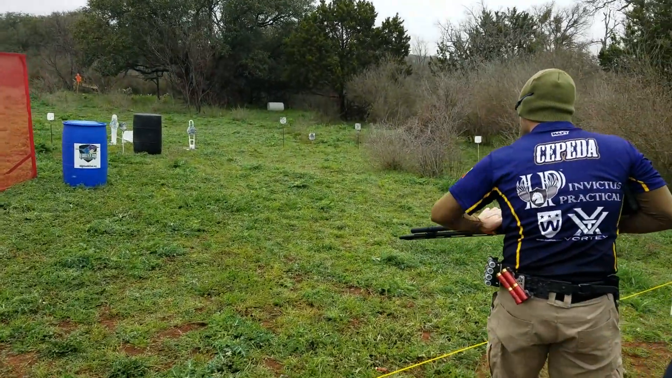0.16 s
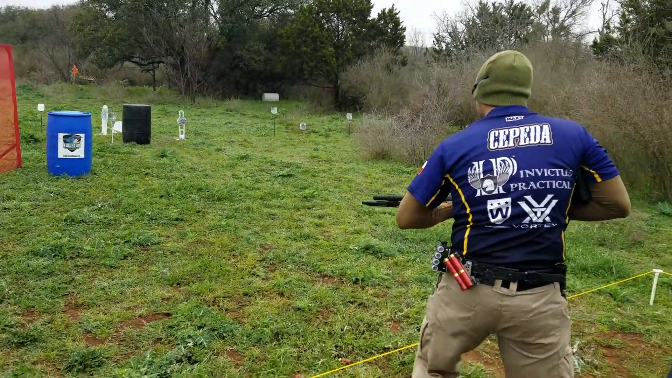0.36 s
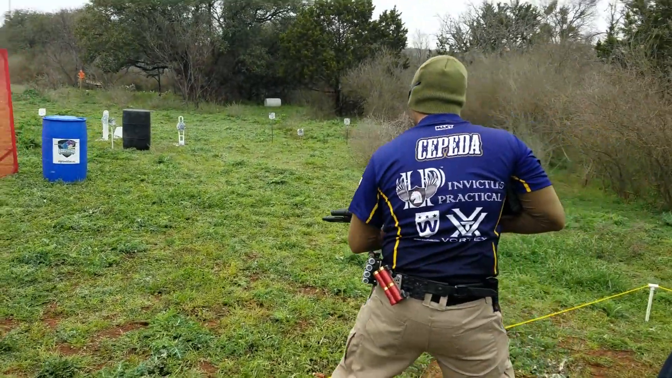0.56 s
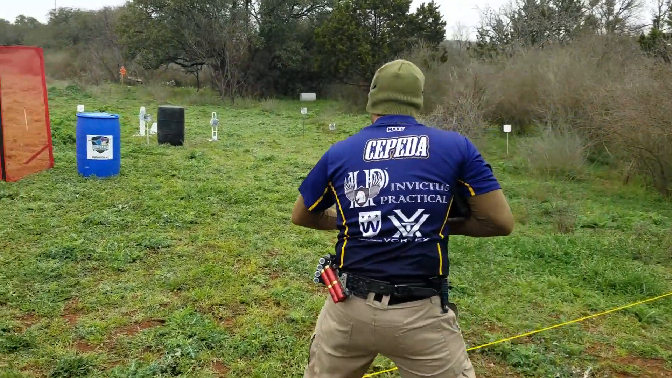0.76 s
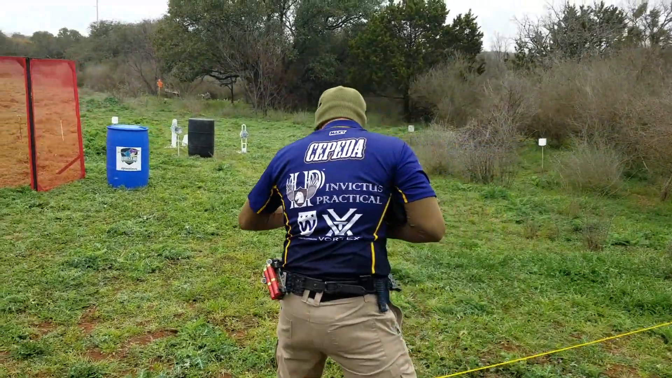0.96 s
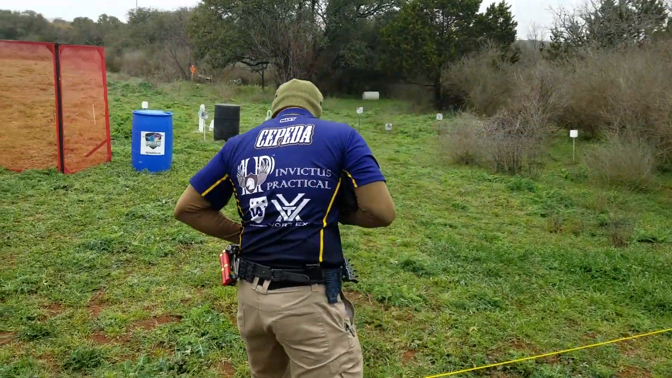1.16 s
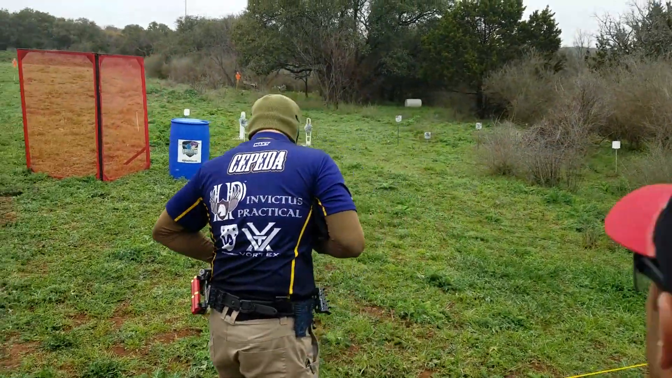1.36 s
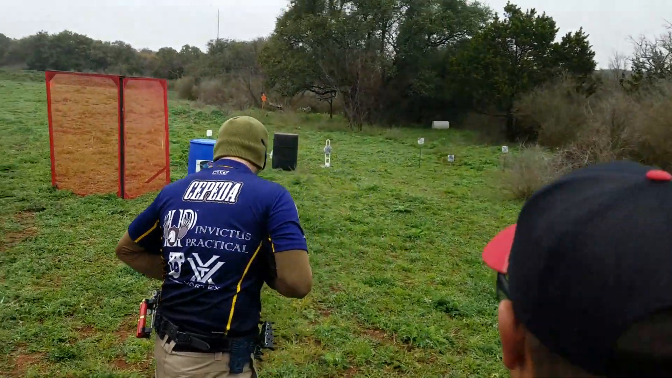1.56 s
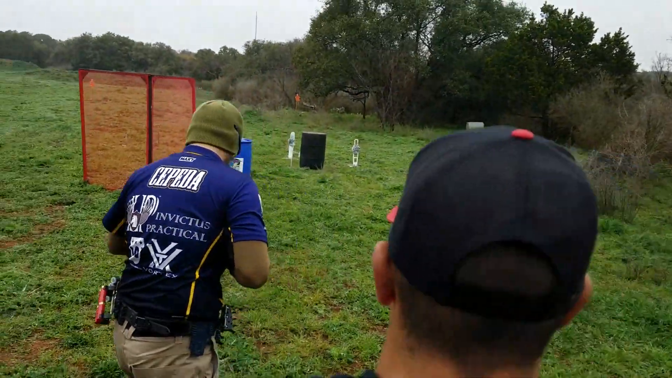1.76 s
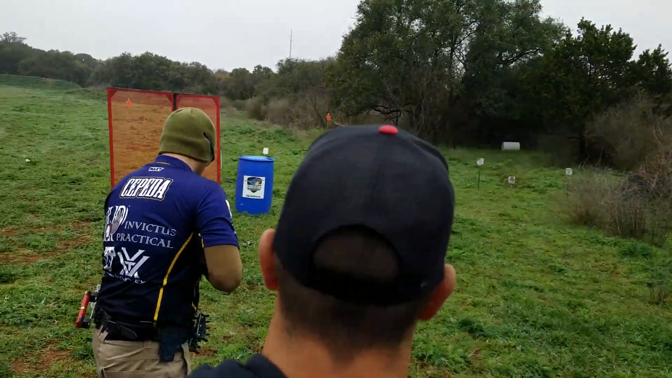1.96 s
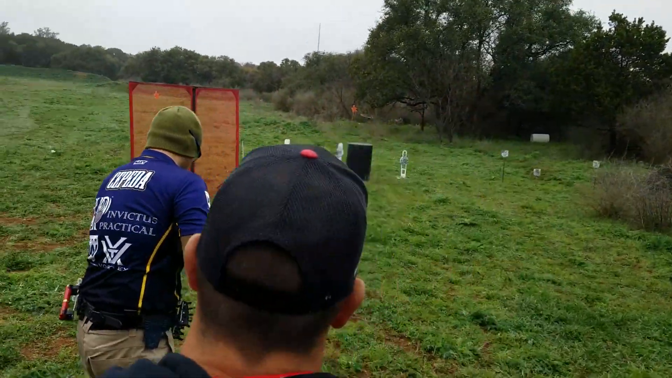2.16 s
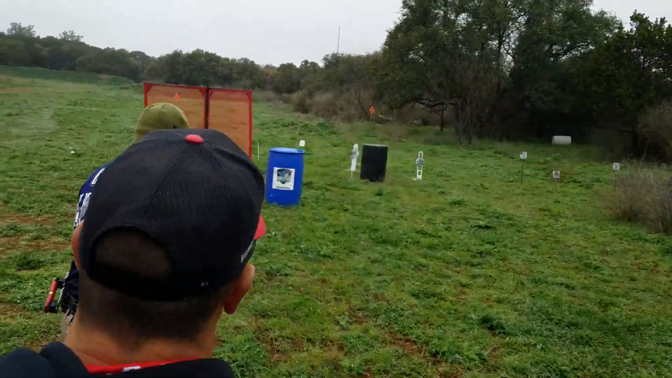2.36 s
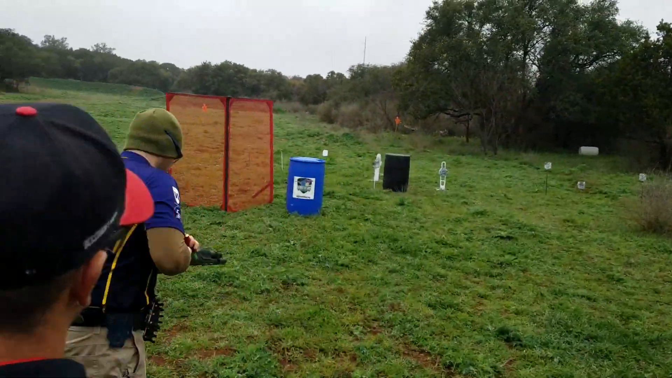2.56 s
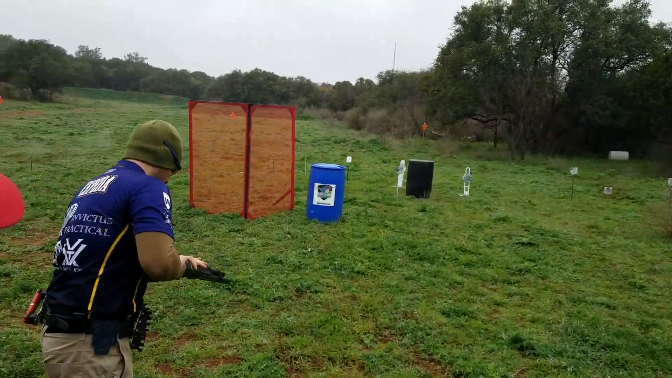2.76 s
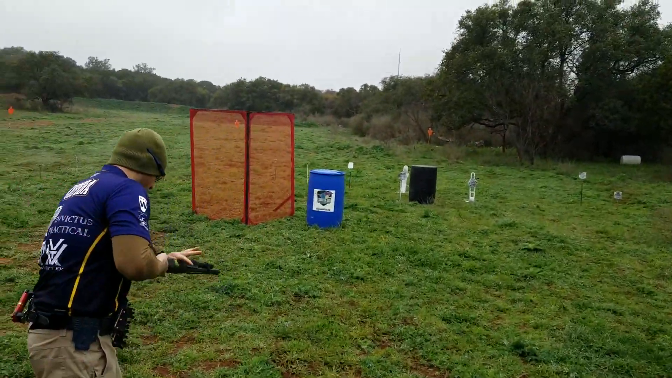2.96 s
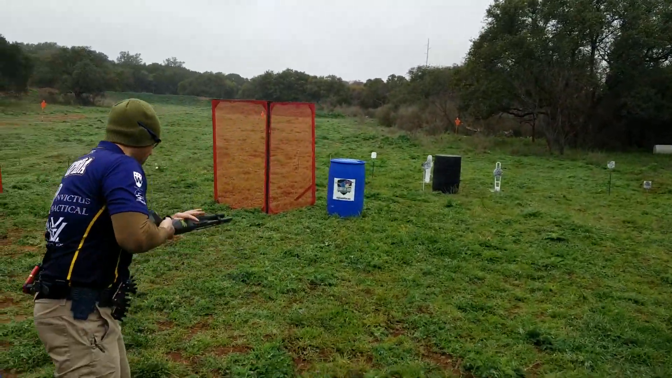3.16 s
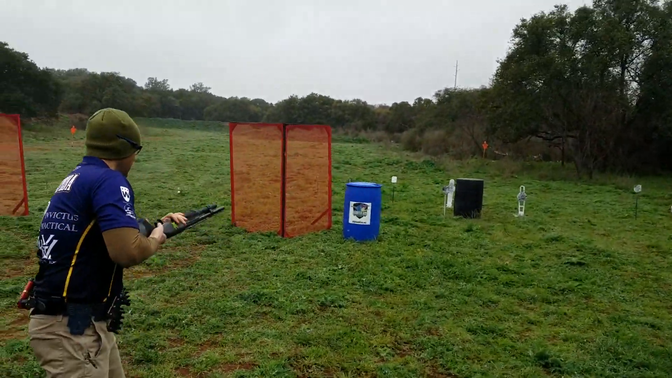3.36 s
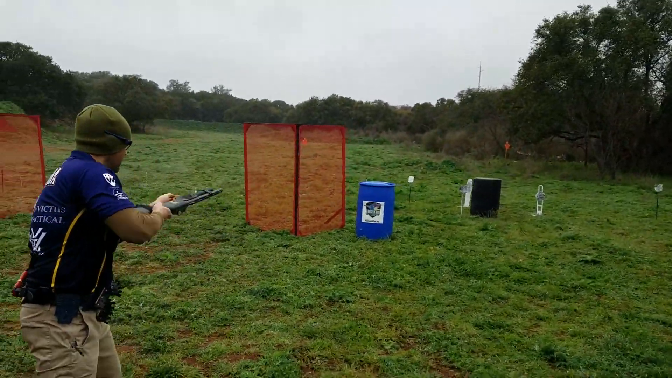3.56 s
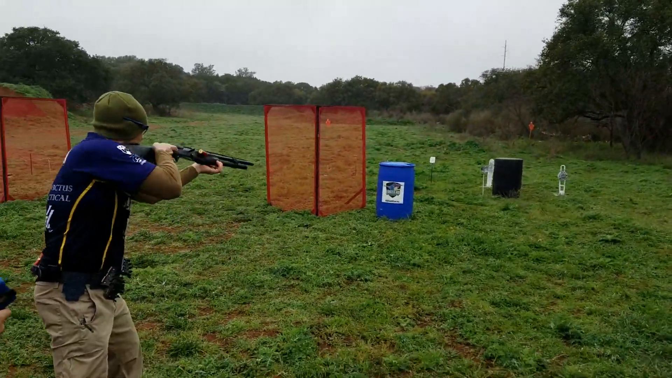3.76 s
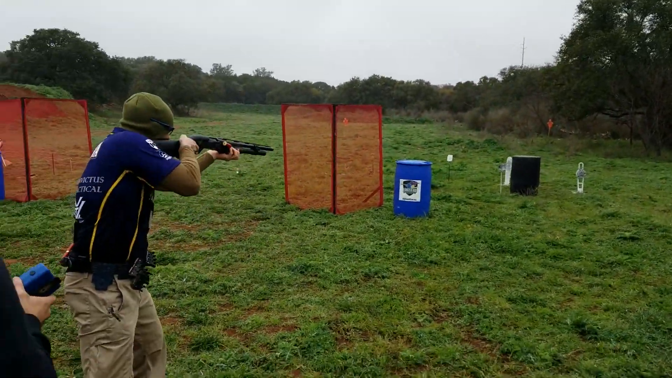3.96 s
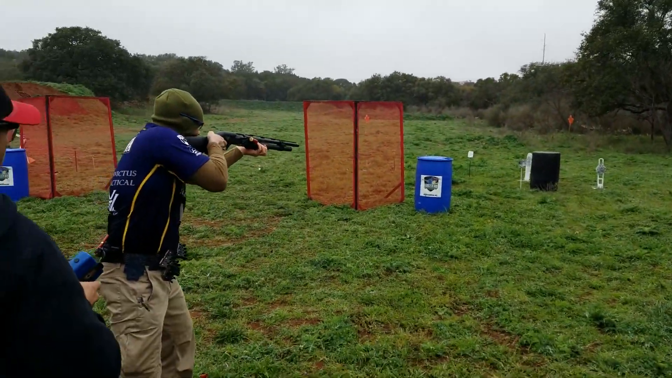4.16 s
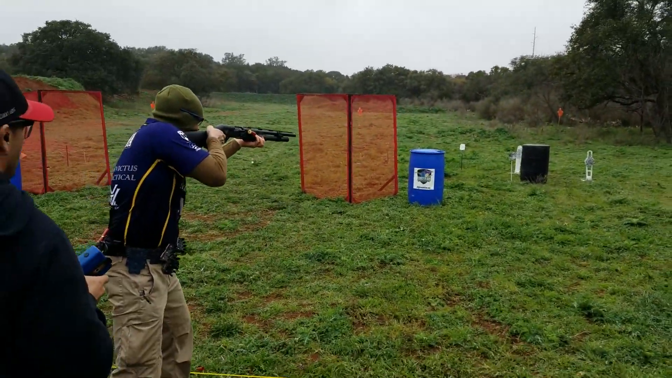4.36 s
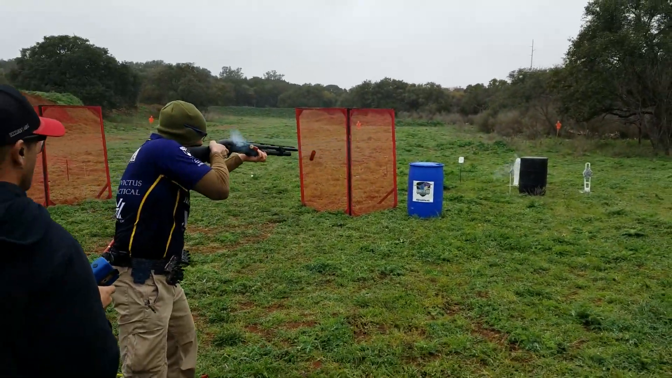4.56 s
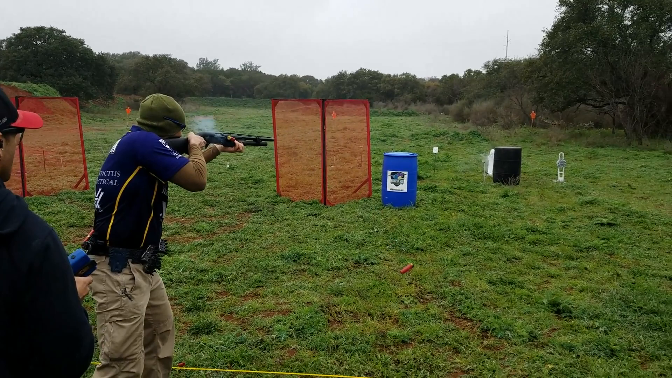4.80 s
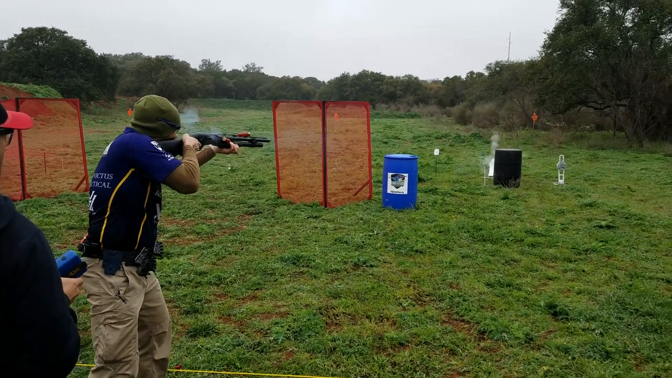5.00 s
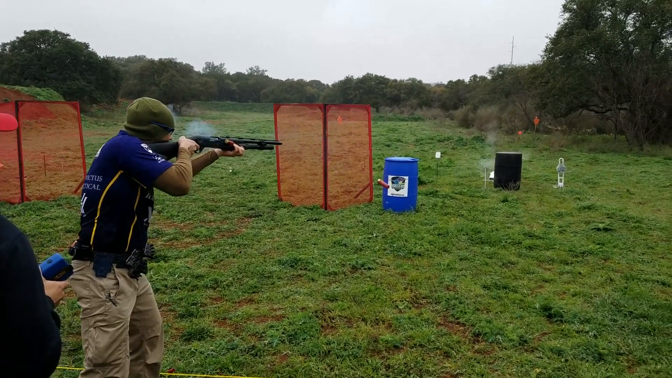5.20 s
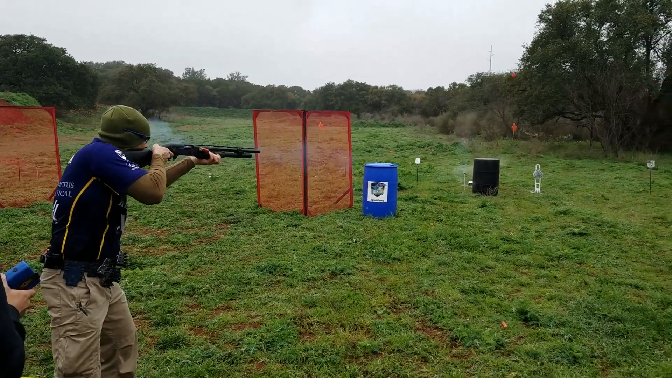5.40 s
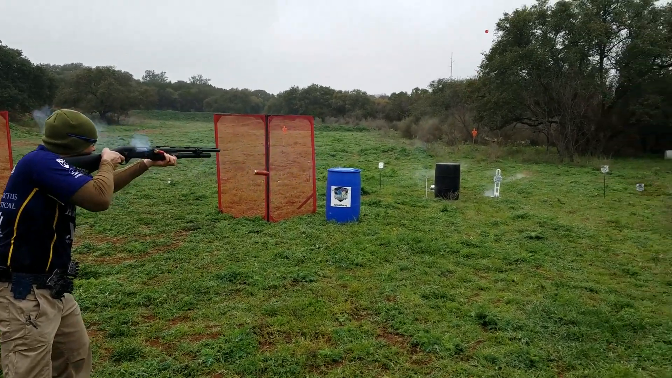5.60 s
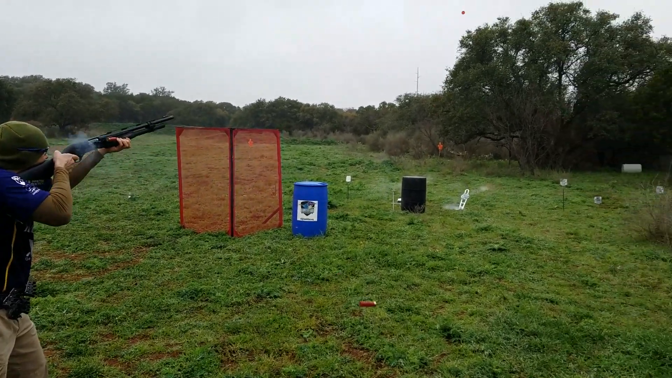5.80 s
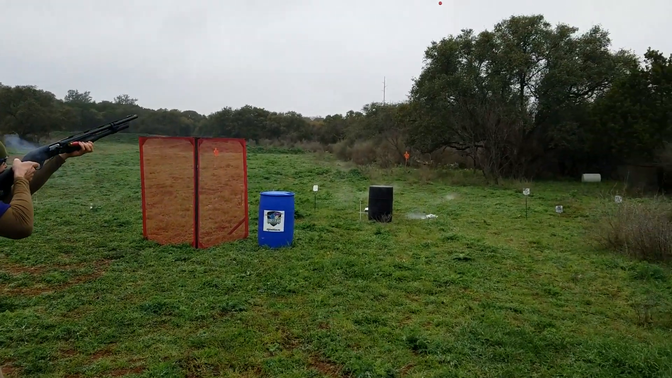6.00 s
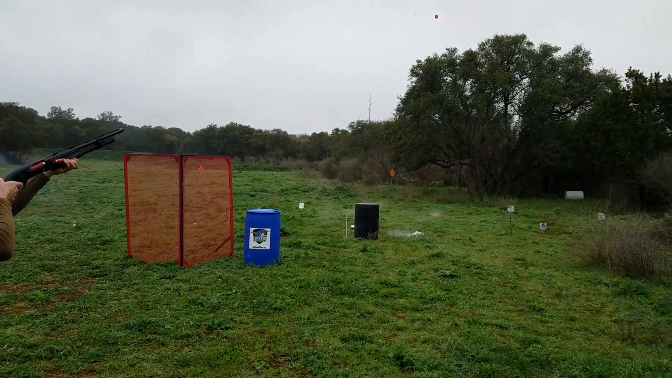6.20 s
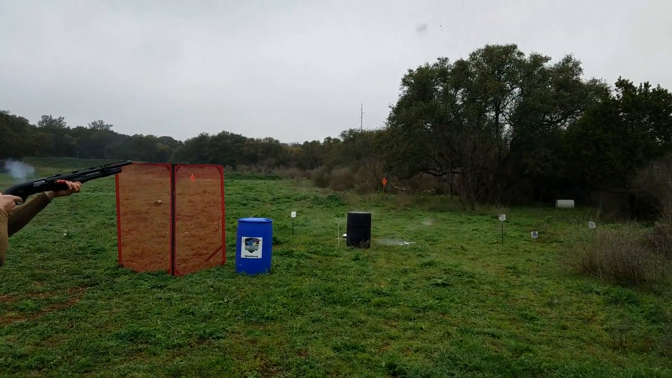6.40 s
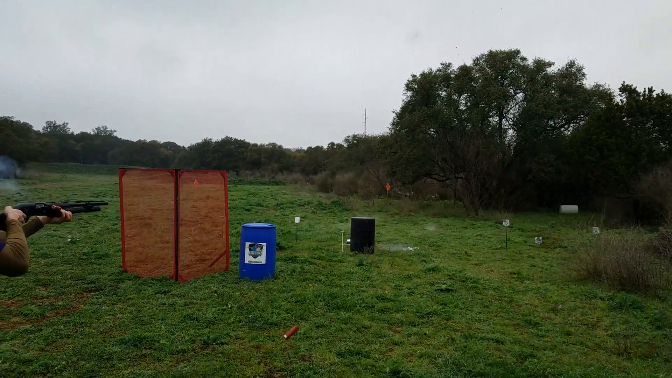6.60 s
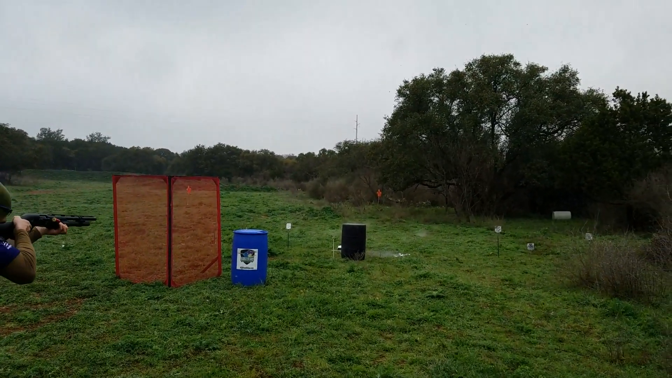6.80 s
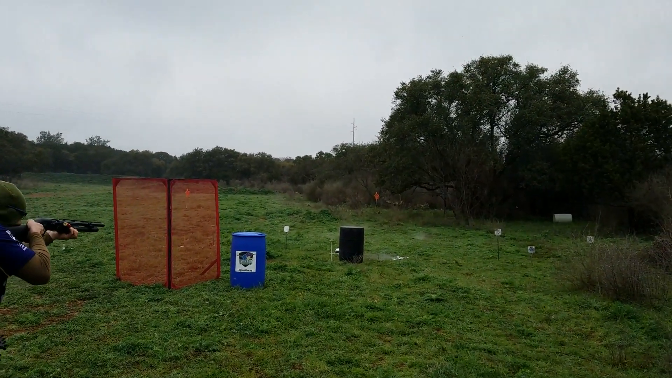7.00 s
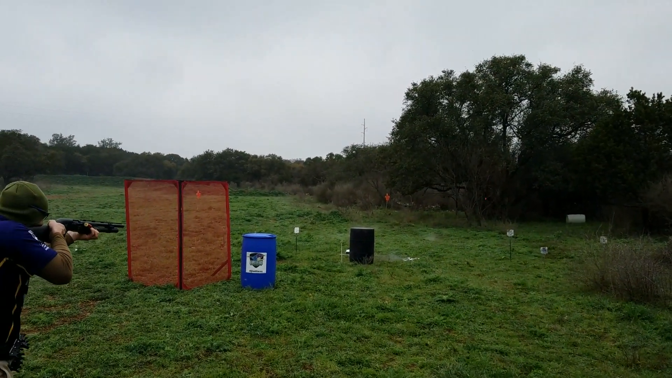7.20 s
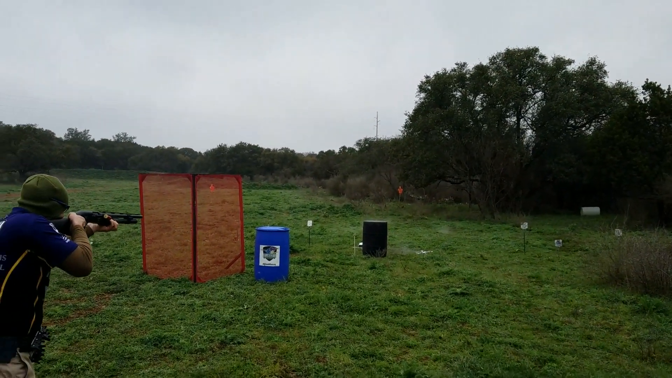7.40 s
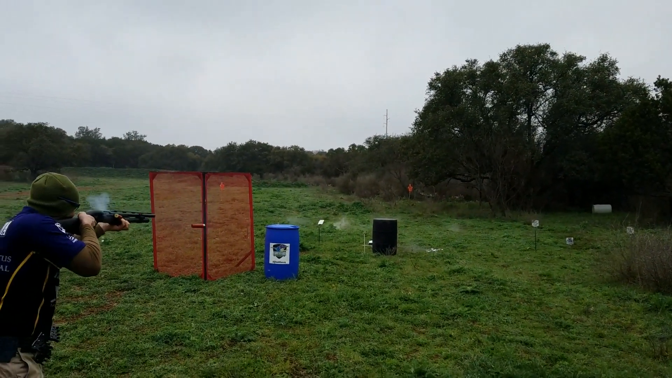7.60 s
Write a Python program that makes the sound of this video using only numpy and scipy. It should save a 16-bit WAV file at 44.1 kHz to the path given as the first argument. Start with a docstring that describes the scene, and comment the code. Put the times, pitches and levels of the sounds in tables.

```python
"""A shotgun fires five times on an open range, after someone has shuffled over wet grass loading it.
Blasts are swelling, crackling noise; barriers, trees and banks return sinking swings and a dull roll.
The action clacks in short noise knocks, and two steel plates ring as sums of decaying sines.
Scuffs, swishes and hush are coloured noise, thuds are low sines; the level dips after each shot."""
import sys
import numpy as np
from scipy import signal
from scipy.io import wavfile
from scipy.ndimage import uniform_filter1d

SR = 44100
rng = np.random.default_rng(int(sys.argv[2]) if len(sys.argv) > 2 else 0)


def inscribe(sig):
    """Save sig as 16-bit PCM at rate SR to the path in sys.argv[1].

    A 1-D sig is mono; a 2-D sig holds one channel per row.
    Samples are clipped to [-1, 1] before scaling.
    """
    pcm = np.round(np.clip(np.atleast_2d(sig).T, -1, 1) * 32767)
    wavfile.write(sys.argv[1], SR, pcm.astype(np.int16))


N = 337365
HZ = np.fft.rfftfreq(512, 1 / SR)[:, None]  # bin frequencies of the short-time spectra

# Levels are relative, ahead of each layer's gain. A positive pan_db leans left.
# Steady outdoor hush, spectrum: pitch_hz, density_db (per Hz)
AIR_SPECTRUM = [(12, -37), (20, 1), (44, -9), (86, -3), (287, -16), (350, -9), (437, -13.5), (745, -20.5),
                (1040, -24.5), (2230, -9), (3580, -28.5), (9840, -31), (15000, -26), (16300, -26.5)]
# Left-right likeness of the hush, also used for grass and metal: pitch_hz, likeness (-1 to 1)
AIR_LIKENESS = [(60, 0.024), (240, 0.17), (950, 0.34), (3770, -0.11), (15000, -0.3)]
# Feet swishing through grass: peak_s, level_db, rise_s (per 20 dB), fall_s (per 20 dB)
SWISHES = [(.06, -38.5, 0.12, 0.093), (.19, -67, .04, 0.11), (.38, -52.5, .03, 0.052),
           (0.701, -36.5, 0.047, 0.022), (.99, -58.5, .04, 0.1), (1.17, -57.5, 0.057, 0.12),
           (1.55, -58.5, 0.26, 0.15), (1.79, -53, 0.042, .08), (1.968, -45.5, 0.042, 0.12),
           (2.18, -59, 0.02, 0.076), (2.59, -59, 0.016, 0.064), (2.778, -41, 0.012, 0.057),
           (3.16, -57.5, 0.12, 0.074), (3.65, -55.5, 0.024, 0.021), (3.73, -59.5, 0.024, 0.047)]
# Faint rustle under the swishes: time_s, level_db
RUSTLE = [(0, -51.5), (.6, -59.5), (1.4, -60.5), (2, -62.5), (2.7, -63), (3.3, -65.5), (4.25, -65.5)]
# Colour of grass: pitch_hz, density_db (per Hz)
GRASS_SPECTRUM = [(88, -53), (150, -10), (679, -1.5), (810, -0.5), (1320, -3), (2000, 0), (2730, -4.5),
                  (3390, -9), (9980, -26), (15100, -24.5), (16300, -56)]
# Steps, cloth and shells being loaded: start_s, level_db, body_hz, treble_db, t60_s, pan_db
SCUFFS = [(0.024, -28, 1920, -2, 0.1, 2), (0.06, -27, 780, 3.5, 0.046, -2),
          (0.092, -38, 1710, -2, 0.048, 8), (0.177, -27.5, 1020, -0.5, 0.055, 0),
          (0.221, -28.5, 980, -45, 0.03, 1), (0.257, -36, 1470, -7, 0.1, 0),
          (0.28, -36, 820, -4, 0.049, -1), (0.37, -27, 1724, -11, 0.059, 1.5),
          (0.468, -40.5, 834, -29, 0.035, 2), (0.508, -39.5, 800, -7, 0.085, 1),
          (0.533, -30.5, 1074, -6, 0.049, 1), (0.549, -40.5, 610, -4, 0.11, -2),
          (0.639, -34.5, 1100, -1.5, 0.034, 2), (0.666, -34, 830, 3.5, 0.056, 1),
          (0.699, -38.5, 840, 4.5, 0.2, 0), (0.877, -30.5, 1750, -8.5, 0.045, 1.5),
          (0.89, -34.5, 830, -8, 0.046, -1), (0.999, -53, 900, -4, 0.053, -1),
          (1.528, -42.5, 1400, -35, 0.15, 6), (1.564, -43, 1090, -1, 0.055, 3),
          (1.796, -33.5, 790, -12, 0.053, 3), (1.857, -35, 940, -12, 0.042, -2),
          (1.904, -36.5, 563, -16, 0.05, 0), (1.925, -40.5, 510, -16, 0.12, 2),
          (1.96, -27, 1100, -4.5, 0.085, 0), (2.031, -44.5, 2360, -10, 0.076, 12),
          (2.135, -40.5, 880, -21, 0.038, 0), (2.166, -34, 1670, -5.5, 0.071, -4),
          (2.214, -40.5, 800, -15, 0.16, 0), (2.377, -51.5, 836, 4.5, 0.077, -9),
          (2.487, -43, 800, -20, 0.06, 0), (2.515, -40.5, 830, -29, 0.023, 1),
          (2.577, -45, 2090, -1.5, 0.1, 1), (2.611, -44.5, 640, -12, 0.086, -1),
          (2.687, -42.5, 1890, 2, 0.059, -2), (2.775, -31, 1360, -4, 0.053, 0),
          (2.789, -28, 780, -26, 0.052, 1), (3.156, -38, 1840, -5.5, 0.051, 2),
          (3.325, -39, 795, -41, 0.043, 0), (3.419, -45, 563, -4, 0.047, -2),
          (3.52, -33, 1950, -23, 0.039, 4), (3.622, -38, 1050, -35, 0.093, 2),
          (3.646, -29, 945, -35, 0.048, 3), (3.721, -27.5, 910, -13, 0.04, 2),
          (3.733, -35, 1030, -33, 0.13, 4), (3.947, -45.5, 1030, -39, 0.23, 3.5)]
# Soft thuds of heels and hands: start_s, level_db, pitch_hz, t60_s
THUDS = [(1.129, -36, 83, 0.18), (1.171, -31.5, 79, 0.12), (1.132, -47, 271, 0.16), (1.401, -51, 187, 0.23),
         (1.452, -38.5, 94, 0.063), (2.299, -49, 185, 0.16), (2.36, -51.5, 187, 0.12),
         (2.832, -39.5, 202, 0.027), (2.949, -44, 119, 0.056), (3.733, -29, 140, 0.019),
         (3.734, -26, 340, 0.013), (4.069, -43, 249, 0.034), (4.2, -54, 191, 0.17), (1.0, -44, 300, 0.058),
         (1.29, -46, 350, 0.051), (6.772, -22.5, 680, 0.0092)]
# The five shots: start_s, blast_db, near_echoes_db, far_echoes_db, pan_db (blast),
# near_boom_db (extra boom in near echoes), punch (0-1, early burst), far_crack_db (extra, far echoes)
SHOTS = [(4.2832, -7, 4, -6, -2.5, 8.5, 0, 3), (4.807, -11.5, -0.5, -7.5, -2, 7, 0.66, 2),
         (5.2924, -10.5, -0.5, -7, -2.5, 4, 0.53, 6.5), (6.057, -9.5, -5, -3.5, -3, 8.5, 0.09, -0.5),
         (7.31, -9, 1.5, -7.5, -2.5, 1.5, 0.96, 5)]
# Colour of the blast: pitch_hz, density_db (per Hz)
BLAST_SPECTRUM = [(30, -45), (70, -18.5), (130, -17.5), (250, -1.5), (500, 3.5), (860, 2), (1110, 1.5),
                  (1740, 0), (2500, -3), (3520, -3.5), (5000, -9.5), (6270, -11), (8910, -25), (12700, -7),
                  (15300, 0.5), (16300, -37.5)]
# Decay of the blast: pitch_hz, t60_s
BLAST_T60 = [(60, 0.18), (250, 0.61), (700, 0.35), (2000, 0.43), (5000, 0.32), (9000, 0.31), (14000, 0.34)]
# Colour of the long scatter from the trees: pitch_hz, density_db (per Hz)
WOODS_SPECTRUM = [(30, -67), (80, -34.5), (170, -11), (400, -22.5), (700, -5), (1300, -21.5), (2000, -5),
                  (4000, -9), (6500, -14), (9000, -17), (13000, -10.5), (16300, -30.5)]
# Decay of the tree scatter: pitch_hz, t60_s
WOODS_T60 = [(60, 3.85), (250, 0.51), (700, 1.45), (2000, 0.86), (5000, 0.77), (9000, 0.61), (14000, 0.56)]
# Left-right likeness of blast, roll and scuffs: pitch_hz, likeness (-1 to 1)
SHOT_LIKENESS = [(60, 0.54), (180, 1), (550, 0.86), (1650, -0.088), (4970, -0.033), (15000, -0.077)]
# Single reflectors: delay_s (after the shot), level_db, crack_db (over boom)
ECHOES = [(0.0395, -1.8, 5.7), (0.0455, -9.3, 5.4), (0.0652, -4.1, 10.1), (0.0855, -14, 2), (0.1, -16, 0),
          (0.1461, -20, -6), (0.1624, -17.4, -12), (0.1925, -16, -8), (0.2088, -14.6, -8),
          (0.218, -16.7, -16), (0.2459, -22, -7), (0.2537, -20.8, -6), (0.2785, -25.8, -11),
          (0.3109, -32, -3), (0.3293, -24.8, 4), (0.3974, -26.6, -12), (0.4595, -34, -3), (0.4697, -34, -2),
          (0.4885, -29.2, -6), (0.4971, -33, -9), (0.5264, -35.5, -6), (0.5643, -37, -4),
          (0.6518, -37.6, -17), (0.771, -41, -8), (0.793, -44, -8), (0.826, -46, -6), (0.908, -43, -8),
          (0.926, -43, -8), (1.011, -45, -6), (1.179, -45, -5)]
# Dull roll in a bass, a boom and an upper band: level_db, fall_db_per_s, late_db, late_fall_db_per_s
ROLL_BANDS = [(-29, 80, -66.5, 9), (-29.5, 51.5, -59, 7.5), (-29.5, 45, -57.5, 5)]
# Far banks that swell the roll: delay_s (after the shot), spread_s, boom_lift_db, upper_lift_db
BANKS = [(.08, .015, 8, 9), (.195, 0.047, 18.5, 11), (.4, .04, 7.5, 5), (.57, .025, -2, 4.5),
         (.79, .04, 7.5, 2), (.97, 0.17, 10, 10.5), (1.2, 0.058, 4, 7)]
# Clacks of the action and empty shells: start_s, level_db, ring_hz, treble_db (over ring), t60_s, pan_db
CLACKS = [(4.3544, -17, 4000, -4, 0.073, -8), (4.3645, -18, 3080, 1, 0.11, 0),
          (4.428, -19.5, 3650, 1.5, 0.02, -4), (4.8932, -13, 3520, -4, 0.013, -3),
          (4.9447, -30, 3300, 2.5, 0.044, -4), (5.3702, -9.5, 3080, 0.5, 0.012, -6.5),
          (5.4322, -31.5, 4600, 5.5, 0.085, -9), (5.9, -41, 3650, -11, 0.069, -7),
          (6.197, -20, 3880, -1.5, 0.034, -2), (6.7721, -55, 3270, -3, 0.015, -23),
          (7.1238, -66.5, 3070, 15, 0.023, -6), (7.283, -54, 5850, -10, 0.012, -6),
          (7.391, -8.5, 3430, -1, 0.016, -2.5), (7.4188, -30, 6070, 8, 0.035, -4)]
# Modes of a steel plate hit by shot: pitch_hz, level_db, t60_s
STRUCK_MODES = [(1690, -40, .7), (4527, -41, .8), (5700, -48, .7), (6648, -46, .32), (7122, -56, .6),
                (7693, -42, .48), (7924, -54, .75), (9286, -44, .14), (9582, -48, .35), (10610, -33, .19),
                (11540, -42, .33), (12520, -24, .14), (12860, -43, .25), (13790, -32, .14),
                (14790, -41, .22)]
# Modes of a plate that falls over: pitch_hz, level_db, t60_s
TOPPLED_MODES = [(861, -60, .9), (1233, -55, 1.), (1739, -64, .26), (2627, -57, 1.2), (3241, -63, .5),
                 (3526, -56, .5), (3854, -62, .8), (3957, -70, 1.), (4377, -60, .4), (5249, -78, 1.5),
                 (5690, -71, 1.5), (6228, -76, 1.5), (8215, -72, .15), (12600, -61, .16)]

AIR_DB = -58.5
SWISH_TREBLE_DB, SWISH_PAN_DB = -2, -5
RUSTLE_TREBLE_DB, RUSTLE_PAN_DB = -14, 6
TICK_DB = 6  # each scuff's treble is added to this
ECHO_PAN_DB = 2.5  # the reflectors lie a little to the left
ROLL_RISE_S, ROLL_PAN_DB = 0.038, 1.5
LESSER_DB, LESSER_FALL_DB_PER_S, LESSER_CRACK_DB = -24.5, 25, -4
STRUCK_S, TOPPLED_S = 5.372, 5.902
EDGE_HZ = 16250  # top of the band


def amp(db):
    """Decibels to gain."""
    return 10 ** (np.asarray(db, float) / 20)


def read(points, hz):
    """Reads a table on a log-frequency axis."""
    f, value = np.transpose(points)
    return np.interp(np.log(hz + 1), np.log(f + 1), value)


def level(points):
    """Gain per bin of a spectrum, scaled to a mean square of 1 over the bins."""
    gain = amp(read(points, HZ))
    return gain / np.sqrt(np.mean(gain ** 2))


def bell(hz, octaves):
    """Gain per bin of a broad resonance, 6 dB down at the given octaves from its centre."""
    pitches = np.geomspace(30, 20000, num=60)
    return level([(f, -6 * (np.log2(f / hz) / octaves) ** 2) for f in pitches])


def add(mix, s, sound, pan_db):
    """Mixes a sound in at time s, leaning left by pan_db."""
    part = mix[:, round(s * SR):][:, :sound.shape[-1]]
    panned = sound * amp([[pan_db / 2], [-pan_db / 2]])
    part += panned[:, :part.shape[1]]


def frames(size):
    """Times of the short-time spectra that cover size samples."""
    return np.arange(size // 128 + 5) * 128 / SR


def noise(size, gain, likeness):
    """Two-channel noise from a gain field over bins and frames; likeness sets how alike the sides are."""
    a, b, c, d = rng.standard_normal((len(frames(size)), len(HZ), 4)).T
    same = np.clip(read(likeness, HZ), -1, 1)
    left = a + 1j * b
    right = same * left + np.sqrt(1 - same ** 2) * (c + 1j * d)
    spectra = np.array([left, right]) * gain
    return signal.istft(spectra, nperseg=512, noverlap=384)[1][:, :size] / 13  # near unit level


def patches(size, depth_db, count):
    """Random dB field, smooth over 12 bins and count frames."""
    field = rng.standard_normal((len(frames(size)), len(HZ))).T
    field = uniform_filter1d(field, size=12, axis=0)
    return depth_db * uniform_filter1d(field, size=count, axis=1)


def air():
    """Steady outdoor hush: coloured noise whose spectrum wavers in small patches."""
    colour = level(AIR_SPECTRUM) * amp(patches(N, 9.0, count=12))
    return amp(AIR_DB) * noise(N, colour, AIR_LIKENESS)


def tilt(treble_db):
    """Grass colour whose treble is lifted by treble_db + 15, fading in from 3 to 6 kHz."""
    airy_db = 3.3 * np.exp(-(np.log2((HZ + 1) / 14000) / 0.1) ** 2)  # a narrow airy lift near 14 kHz
    treble = np.clip(np.log2((HZ + 1) / 3000), 0, 1)
    return level(GRASS_SPECTRUM) * amp(treble * (treble_db + 15.0) + airy_db)


def grass():
    """Noise swishes that swell and die exponentially, over a faint rustle; both flicker."""
    t = frames(N)
    swish = sum(amp(db - 20 * np.maximum((s - t) / rise_s, (t - s) / fall_s))
                for s, db, rise_s, fall_s in SWISHES)
    rustle = amp(np.interp(t, *np.transpose(RUSTLE), right=-120))  # silent after its last point
    out = np.zeros((2, N))
    for gain, treble_db, pan_db in ((swish, SWISH_TREBLE_DB, SWISH_PAN_DB),
                                    (rustle, RUSTLE_TREBLE_DB, RUSTLE_PAN_DB)):
        flicker = amp(3.17 * rng.standard_normal(len(t)))
        add(out, 0, noise(N, gain * flicker * tilt(treble_db), AIR_LIKENESS), pan_db)
    return out


def scuffs():
    """Crunchy decaying noise with a narrow-band tick and a hollow sine knock at its start."""
    out, t = np.zeros((2, N)), np.arange(6144) / SR
    for s, db, hz, treble_db, t60, pan_db in SCUFFS:
        tick_hz = rng.uniform(2900, 5150)
        colour = np.hypot(1.054 * tilt(treble_db), bell(hz, 0.5))
        crunch = amp(3.6 * uniform_filter1d(rng.standard_normal(len(t)), size=40))
        envelope = amp(-60 * t / t60) * (1 - np.exp(-t / .0009))
        scuff = noise(len(t), colour, SHOT_LIKENESS) * crunch * envelope
        tick = noise(len(t), bell(tick_hz, .15), AIR_LIKENESS) * amp(-60 * t / .03)
        tick *= amp(TICK_DB + treble_db)
        knock = 0.92 * np.sin(2 * np.pi * hz * t) * amp(-60 * t / 0.038)  # hollow shell or magazine tube
        add(out, s, amp(db - 8.0) * (scuff + tick + knock), pan_db)
    return out


def thuds():
    """Soft decaying sines; the lower the pitch, the slower the onset."""
    out, t = np.zeros((2, N)), np.arange(6144) / SR
    for s, db, hz, t60 in THUDS:
        onset = 1 - np.exp(-t * hz / 0.65)
        add(out, s, amp(db - 60 * t / t60) * np.sin(2 * np.pi * hz * t) * onset, 0)
    return out


def blast(size, punch):
    """Muzzle blast: noise swells over a few ms, dies fast nearby and slowly, in lumps, in the trees."""
    t, at = frames(size), np.arange(size) / SR
    near = level(BLAST_SPECTRUM) * amp(-60 * t / read(BLAST_T60, HZ))
    lumps = amp(-13.0 + patches(size, 13.0, count=2))
    trees = lumps * level(WOODS_SPECTRUM) * amp(-60 * t / read(WOODS_T60, HZ))
    swell = np.clip(at / 0.0084, 0, 1) ** 2.25
    front = 1 + punch * np.exp(-((at - .012) / 0.0052) ** 2)
    crackle = amp(11.0 * uniform_filter1d(rng.standard_normal(size), size=30))  # fine, rapid, in loudness
    return noise(size, np.hypot(near, trees), SHOT_LIKENESS) * swell * front * crackle


def wave(start_hz, end_hz, fall_s, fade_s, rise_s):
    """A reflected pressure step: a swing whose pitch sinks as it dies, scaled to peak at 1."""
    t = np.arange(1800) / SR
    hz = end_hz + (start_hz - end_hz) * np.exp(-t / fall_s)
    envelope = np.exp(-t / fade_s) * (1 - np.exp(-t / rise_s)) ** 2
    swing = np.sin(2 * np.pi * np.cumsum(hz) / SR) * envelope
    return swing / abs(swing).max()


def lesser(count):
    """Small reflectors scattered over the range, weaker with distance."""
    place, weakness = rng.random((count, 2)).T
    delay = 0.078 + (.6 - 0.078) * place  # seconds after the shot
    return [(s, LESSER_DB - LESSER_FALL_DB_PER_S * s - 4.0 * weak, LESSER_CRACK_DB)
            for s, weak in zip(delay, weakness)]


def roll(size, lumps_db, far_crack_db):
    """Noise in three bands falls fast, then lingers; far banks swell the upper two as echoes arrive."""
    t = frames(size)
    bass_db, boom_db, upper_db = [
        10 * np.log10(amp(db - fall_db * t) ** 2 + amp(late_db - slow_db * t) ** 2)
        for db, fall_db, late_db, slow_db in ROLL_BANDS]
    delay, spread, *lifts_db = np.transpose(BANKS)
    arrivals = np.exp(-((t - delay[:, None]) / spread[:, None]) ** 2)
    boom_lift_db, upper_lift_db = np.array(lifts_db) @ arrivals
    bass = amp(bass_db + lumps_db[0]) * bell(260, 1.0)
    boom = amp(boom_db + boom_lift_db + lumps_db[1]) * bell(626, 0.35)
    upper_colour = np.hypot(bell(1400, 0.49), 0.38 * bell(3060, 0.54))
    upper = amp(upper_db + upper_lift_db + .5 * far_crack_db + 0.87 * lumps_db[2]) * upper_colour
    rise = np.minimum(t / ROLL_RISE_S, 1)
    return noise(size, rise * np.sqrt(bass ** 2 + boom ** 2 + upper ** 2), SHOT_LIKENESS)


def landscape(size, echoes, lumps_db, near_boom_db, far_crack_db):
    """What the range sends back: near echoes; far echoes, smeared by foliage, over a dull roll."""
    near, far = np.zeros((2, size)), np.zeros((2, size))
    for delay, db, crack_db in echoes:
        spread = amp(.5 * rng.standard_normal(3))  # each echo varies a little in pitch and level at random
        waver_db = 1.5 * rng.standard_normal()
        blur = np.clip((delay - .07) / .08, 0, 1)  # 0 near, 1 far
        rise_s = 0.00028 + 0.00298 * blur  # far foliage smears the front and rings longer
        thump = wave((320 - 90 * blur) * spread[0], 200 * spread[0], 0.0039, 0.0025, 0.00069)
        thump *= amp(-9.5 - 19.0 * blur)
        boom = wave((800 - 200 * blur) * spread[1], 570 * spread[1],
                    0.0012, 0.0021 + 0.00041 * blur, rise_s)
        crack = wave((1450 - 250 * blur) * spread[2], 1000 * spread[2],
                     0.0012, 0.0017 + 0.00033 * blur, rise_s)
        share = amp(crack_db)
        boom *= amp(near_boom_db * (1 - blur))
        crack *= share * amp(far_crack_db * blur)
        sound = amp(db + waver_db) * (thump + (boom + crack) / np.hypot(1, share))
        add(far if blur else near, delay + 0.00094 * (1 - blur) - rise_s, sound, ECHO_PAN_DB)
    add(far, 0, roll(size, lumps_db, far_crack_db), ROLL_PAN_DB)
    return near, far


def shots():
    """Five blasts with their echoes; reflectors and the lumps of the roll fall alike after each."""
    out, size = np.zeros((2, N)), round(1.4 * SR)
    lumps = rng.standard_normal((len(frames(size)), 3))
    lumps_db = 5.9 * uniform_filter1d(lumps, size=3, axis=0).T
    echoes = ECHOES + lesser(count=12)
    for s, blast_db, near_db, far_db, pan_db, near_boom_db, punch, far_crack_db in SHOTS:
        near, far = landscape(size, echoes, lumps_db, near_boom_db, far_crack_db)
        add(out, s - .005, amp(blast_db) * blast(size, punch), pan_db)
        add(out, s, amp(near_db) * near + amp(far_db) * far, 0)
    return out


def clacks():
    """Metal on metal: short noise knocks through a ring resonance and a bright treble one."""
    out, t = np.zeros((2, N)), np.arange(2048) / SR
    for s, db, hz, treble_db, t60, pan_db in CLACKS:
        colour = np.hypot(bell(hz, 0.78), amp(treble_db) * bell(13200, 0.29))
        envelope = amp(-60 * t / t60) * (1 - np.exp(-t / 0.00022))
        add(out, s, amp(db + 0.5) * noise(len(t), colour, AIR_LIKENESS) * envelope, pan_db)
    return out


def steel():
    """Two plates ring: each mode is a decaying sine at a random phase."""
    out, t = np.zeros((2, N)), np.arange(SR) / SR
    for s, modes, pan_db in ((STRUCK_S, STRUCK_MODES, 1.0), (TOPPLED_S, TOPPLED_MODES, -5.0)):
        for hz, db, t60 in modes:
            ring = np.sin(2 * np.pi * (hz * t + rng.random()))
            add(out, s, amp(1.5 + db - 60 * t / t60) * ring, pan_db)
    return out


def scene():
    """Everything that reaches the microphones; gun and steel are lifted by 5 dB."""
    return amp(5.0) * (shots() + clacks() + steel()) + scuffs() + thuds() + grass() + air()


def record(dry):
    """Gain control that recovers slowly, a bass roll-off, a soft ceiling, then the band limit."""
    power_db = 10 * np.log10(abs(uniform_filter1d((dry ** 2).mean(0), size=800)) + 1e-12)
    fall_db = np.arange(N) * 21.2 / SR  # the held peak sinks 21.2 dB per second
    held_db = np.maximum.accumulate(power_db + fall_db) - fall_db
    over_db = np.maximum(held_db + 37.5, 0)
    ducked = dry / amp(0.21 * uniform_filter1d(over_db, size=300))
    highpass = signal.butter(2, 48, "high", fs=SR, output="sos")  # small ports lose the bass
    thin = signal.sosfilt(highpass, ducked)
    soft = np.tanh(thin ** 3 / 3 + thin)
    lowpass = signal.firwin(511, EDGE_HZ, window=("kaiser", 9), fs=SR)
    return signal.oaconvolve(soft, lowpass[None], "same")


dry = scene()
out = record(dry)
inscribe(out)
```